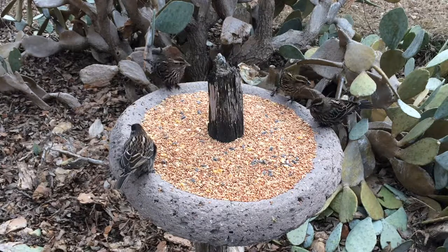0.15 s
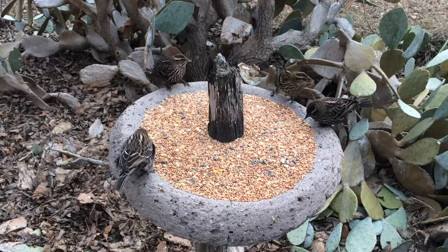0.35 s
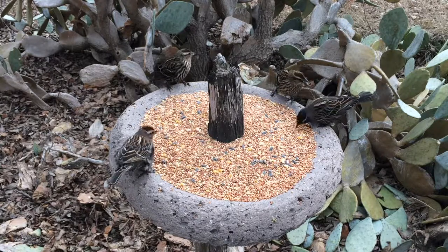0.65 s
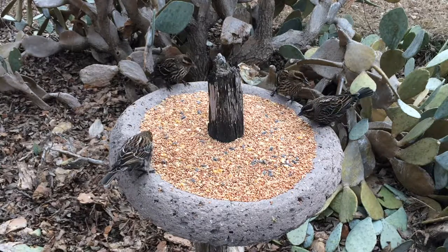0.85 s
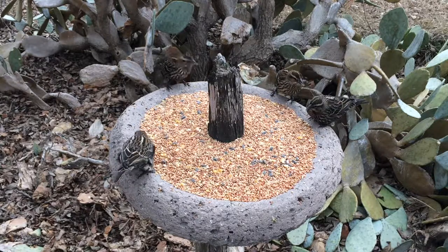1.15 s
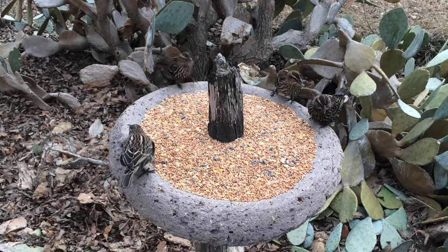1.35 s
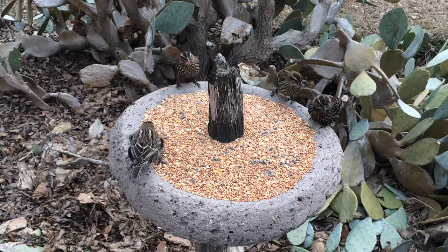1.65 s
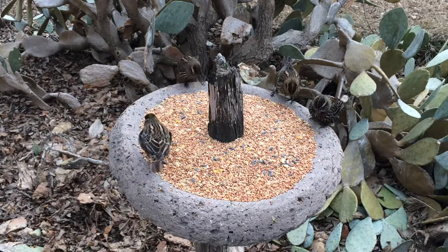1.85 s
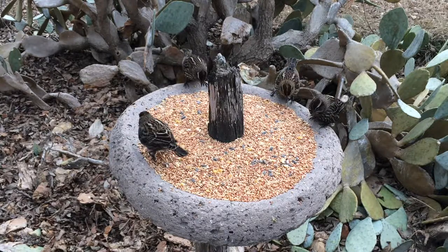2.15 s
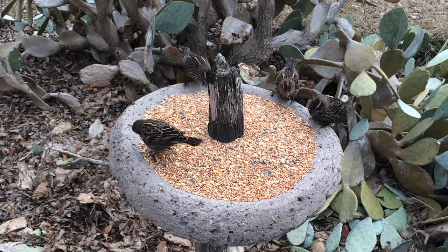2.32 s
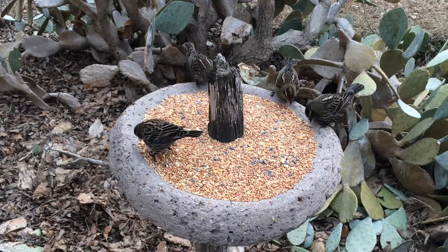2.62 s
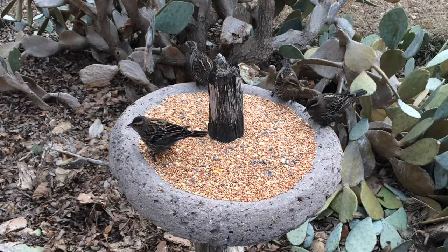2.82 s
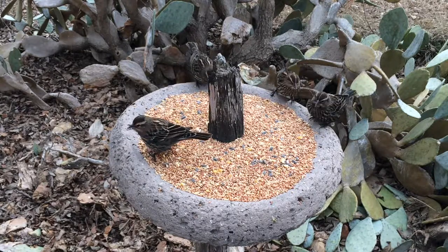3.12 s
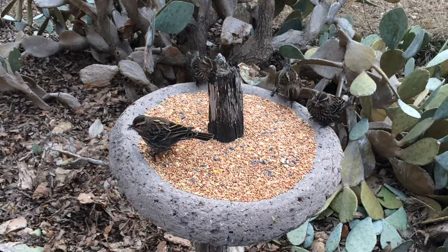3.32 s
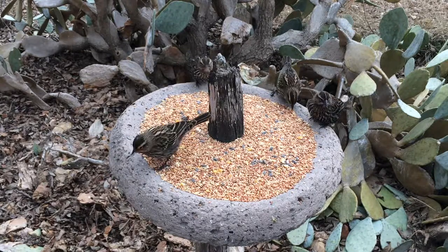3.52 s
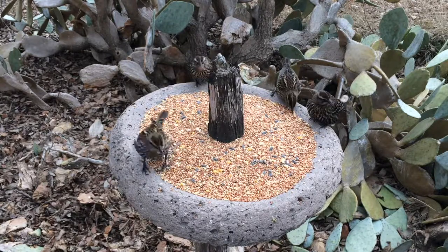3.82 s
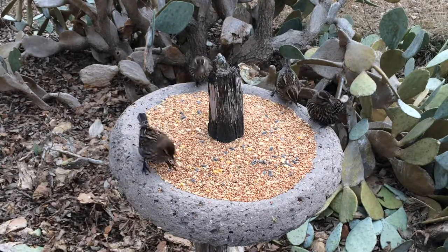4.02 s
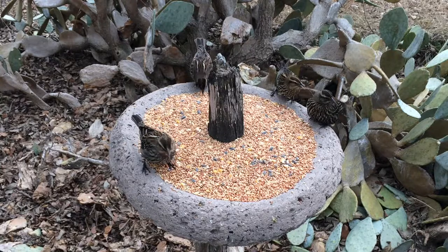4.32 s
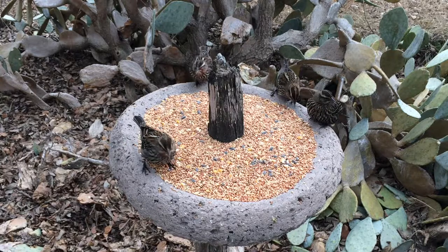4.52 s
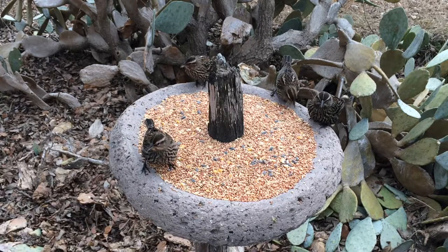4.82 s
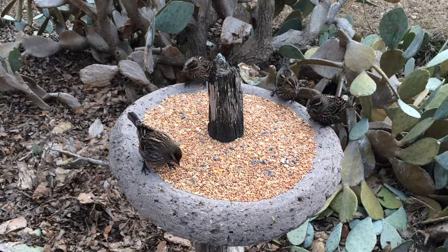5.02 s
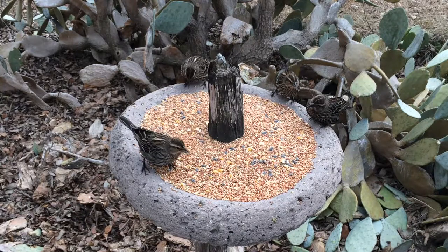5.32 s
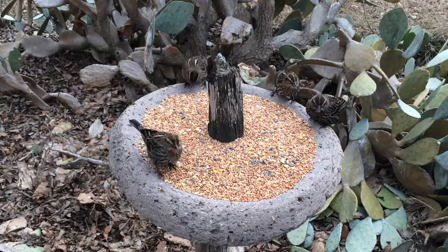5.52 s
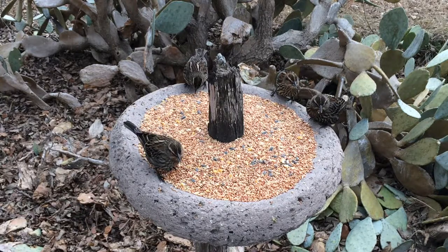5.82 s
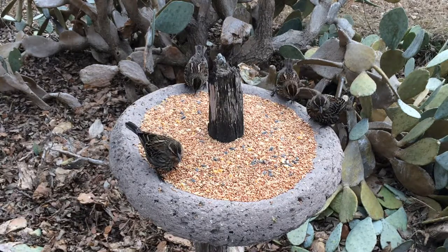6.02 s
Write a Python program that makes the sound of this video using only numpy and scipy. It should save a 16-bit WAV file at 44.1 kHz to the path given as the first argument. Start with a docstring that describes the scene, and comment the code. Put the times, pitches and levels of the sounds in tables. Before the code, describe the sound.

Irregular clicks of birds cracking seed husks in a stone bowl, with occasional brief calls and light gusts on the microphone.

```python
"""Sparrows feed on seed in a stone bowl among cactus in a quiet garden.
Beaks tick and husks crack: each snap rings beak and seed, and ground and plants scatter it back.
Loose seed shifts and crackles under the birds. They call in thin rising notes; lower chirps come
from further off. Light gusts rumble on the microphone over a soft outdoor hush."""
import sys
import numpy as np
from scipy import signal
from scipy.fft import rfft, irfft
from scipy.io import wavfile
from scipy.ndimage import uniform_filter1d

SR = 44100
rng = np.random.default_rng(int(sys.argv[2]) if len(sys.argv) > 2 else 0)


def dump_mix(stems):
    """Bounce the given channels to the path in sys.argv[1] as a 16-bit WAV at rate SR."""
    frames = np.atleast_2d(stems).T  # one column per channel
    limited = np.clip(frames, -1, 1)  # hard clip at full scale
    pcm = np.round(limited * 32767).astype(np.int16)
    wavfile.write(sys.argv[1], SR, pcm)


N = 271297
TIME_S = np.arange(N) / SR

# Hush spectrum (frequency [Hz], relative density [dB])
HUSH_SPECTRUM = [(71, -30), (120, -5), (173, -2), (231, -7), (348, -8), (436, -10.5), (569, -11.5),
                 (805, -14), (892, -14), (1520, -19), (1940, -21.5), (2870, -27.5), (4780, -33),
                 (14200, -36), (16000, -45)]
# Slow swell of the hush (time [s], gain [dB])
HUSH_SWELL = [(0, -2), (4.0, -1.83), (4.8, -.7), (6.15, -0.8)]
# Wind spectrum (frequency [Hz], relative density [dB])
WIND_SPECTRUM = [(30, -20), (42, -10.5), (55, 1.5), (80, -0.5), (115, -3), (185, -13.5), (280, -35),
                 (450, -37)]
# Breeze envelope (time [s], relative level [dB])
BREEZE = [(0, -54), (.4, -50), (.7, -47), (1.15, -49), (1.45, -58.5), (2.4, -59), (2.7, -54), (4.25, -59),
          (4.7, -51), (5.25, -51), (5.5, -55.5), (6.15, -60.5)]
# Single eddies (time [s], peak level [dB])
BUFFETS = [(0.016, -39), (0.484, -34), (0.551, -37.5), (0.688, -35.5), (0.808, -35), (0.919, -48),
           (0.995, -32), (1.095, -41), (1.288, -38.5), (4.702, -39.5), (4.783, -33.5), (4.922, -45.5),
           (5.037, -47.5), (5.105, -45), (5.161, -48)]
# Low chirps (time [s], pitch [Hz], level [dB])
CHIRPS = [(1.487, 1530, -58.5), (2.678, 2490, -67), (4.937, 1937, -50.5), (5.197, 1570, -65.5),
          (5.558, 1850, -58)]
# Upward flicks in each chirp (delay [s], length [s], start [x pitch], end [x pitch], gain [dB])
FLICKS = [(0, .013, 1, 1.9, 0), (0.012, .015, 1.2, 1.5, -.5), (.017, .009, 1.5, 1.8, -6)]
# Thin calls (time [s], length [s], start pitch [Hz], top pitch [Hz], level [dB])
THIN_CALLS = [(1.523, .04, 6600, 7700, -62), (1.928, 0.027, 6200, 7700, -52),
              (4.388, 0.024, 5400, 7780, -43.5), (4.769, .031, 5500, 7240, -56.5),
              (5.697, 0.027, 5900, 7750, -56), (5.796, 0.042, 6700, 7470, -64.5),
              (5.89, 0.069, 6650, 6820, -71), (5.978, .045, 4900, 5440, -75),
              (6.065, 0.072, 4150, 4300, -75)]
# Seed-on-seed spectrum (frequency [Hz], relative density [dB])
SEED_SPECTRUM = [(2500, -26), (4000, 4), (7000, 6.5), (10000, 5), (13500, 8), (16000, 8.5)]
# Birds shuffling in the seed (time [s], relative level [dB])
SHUFFLE = [(0.0, -79), (1.4, -76.5), (1.66, -71.5), (2.88, -79), (3.54, -72.5), (4.01, -72), (4.31, -69),
           (4.81, -73.5), (5.46, -69.5), (6.15, -72)]
# Beak or foot sweeping the seed (first stroke [s], last stroke [s], relative level [dB])
RUMMAGES = [(1.39, 1.39, -69), (2.04, 2.19, -68), (2.816, 2.816, -69.5), (3.476, 3.545, -65),
            (3.72, 3.72, -68.5), (3.97, 4.03, -65.5), (5.08, 5.53, -70.5), (5.727, 5.727, -63.5)]
# Pecks and husk cracks, three modes each
# (time [s], relative level [dB], low mode [Hz], middle mode re low [dB], high mode re low [dB])
PECKS = [(0.425, -17, 4210, -24, -6), (0.4387, -26, 2800, -1, -6), (0.451, -25.5, 4010, -7, -3),
         (0.654, -28, 4640, -23, -15), (0.6942, -26.5, 3150, -1.5, 4), (0.701, -32, 3240, -14, 1),
         (0.791, -35, 3550, -6, 1), (1.3031, -14.5, 4650, -24, -12.5), (1.563, -11, 2990, -9, -10),
         (1.6651, -6.5, 4020, -16, -15), (1.7401, -25, 3220, 3, -19), (1.7555, -14.5, 3100, -6, -7),
         (1.9024, -4, 1740, -13.5, -10), (2.3659, -26.5, 2750, -1.5, -1), (2.4753, -2.5, 4560, -4, 2.5),
         (3.0856, -30, 3580, -13, -9), (3.1077, -29.5, 5430, -3.5, -5), (3.1345, -13, 3170, -12, -9),
         (3.2598, -4, 5000, -3, -15), (3.2663, -18.5, 2180, 13, -1), (3.5864, -27.5, 3040, -22, -9),
         (3.7025, -31.5, 4300, -5, 0), (3.7683, -20, 3170, -4, -1), (3.9511, -28, 3190, -10, 3),
         (4.1691, -9.5, 4050, -6, -11), (4.1765, -18, 3420, 12.5, 11.5), (4.2008, -14.5, 2530, -1, -12),
         (4.2441, -28, 2990, 0, -13), (4.2611, -17.5, 1750, 5.5, -11), (4.2648, -22, 2470, 11, 1),
         (4.275, -27, 2090, 12, -6), (4.2866, -12, 2530, -4, -11.5), (4.2911, -23, 2480, 6, 8),
         (4.3196, -8.5, 3700, -12, -12), (4.3705, -27, 2280, 9.5, -10), (4.382, -39, 1630, 11, 12),
         (4.4497, -7.5, 3380, -0.5, -10), (4.4832, -26, 4550, -16, -20), (4.5279, -2, 3930, -10.5, -11),
         (4.6978, -15, 1770, 9, 6), (4.7022, -17, 2950, 6, 0), (4.8693, -19, 3000, -7, -10),
         (4.8881, -15, 2790, -24, -10), (5.3255, -28.5, 2380, -3, 3), (5.6387, -31, 4930, -6, -1),
         (5.6929, -15, 2550, -25, 0.5), (5.933, 0.5, 3650, -33, -14)]
# Damping of the low, middle and high mode (Q per filter pass [-])
MODE_Q = (1.8, 2.2, 2.8)
LOW_MODE_HZ, MIDDLE_MODE_HZ, HIGH_MODE_HZ = 3200, 7170, 13600   # beak and seed, typical peck


def from_db(db):
    return 10 ** (np.asarray(db) / 20)


def unit_rms(x):
    return x / np.sqrt(np.mean(x ** 2) + 1e-20)


def unit_energy(x):
    return x / np.sqrt(np.sum(x ** 2) + 1e-20)


def envelope(rows):
    """Amplitude curve through (time [s], level [dB]) points."""
    return from_db(np.interp(TIME_S, *np.transpose(rows)))


def add(out, time_s, sound):
    at = max(round(time_s * SR), 0)
    out[at:at + len(sound)] += sound[:max(N - at, 0)]


def butter(x, order, hz, kind="low"):
    return signal.sosfilt(signal.butter(order, hz, kind, fs=SR, output="sos"), x)


def resonate(x, hz, q):
    """Two-pass resonance, peak gain 1."""
    b, a = signal.iirpeak(hz, q, fs=SR)
    return signal.lfilter(b, a, signal.lfilter(b, a, x + 1e-18))


def coloured(white, spectrum):
    """Shape to a spectrum, steep roll-off past its ends; rms 1."""
    hz, db = np.transpose(spectrum)
    bins_hz = np.maximum(np.arange(N // 2 + 1) * SR / N, 1)
    rolloff = np.minimum(bins_hz / hz[0], 1) ** 4 * np.minimum(hz[-1] / bins_hz, 1) ** 4
    gain = from_db(np.interp(np.log(bins_hz), np.log(hz), db))
    return unit_rms(irfft(rfft(white) * rolloff * gain, N))


def garden(x, near_db, far_db, near_t60_s=.044, far_t60_s=.23, predelay_s=.004):
    """Add quick, thin echoes off bowl, ground and cactus, and a duller tail from further plants."""
    t = np.arange(SR // 2) / SR
    age_s = np.maximum(t - predelay_s, 0)

    def scatter(rise_s, t60_s):
        return rng.standard_normal(len(t)) * (1 - np.exp(-age_s / rise_s)) * from_db(-60 * age_s / t60_s)

    near = butter(scatter(.0015, near_t60_s), 1, 2500, "high")
    far = butter(scatter(.01, far_t60_s), 1, 9000)
    echoes = from_db(near_db) * unit_energy(near) + from_db(far_db) * unit_energy(far)
    return x + signal.fftconvolve(x, echoes)[:N]


def hush(level_db=-57):
    """Far outdoor noise, swelling slowly."""
    return from_db(level_db) * envelope(HUSH_SWELL) * coloured(rng.standard_normal(N), HUSH_SPECTRUM)


def wind(breeze_gain_db=-.5, rise_s=.024, fall_s=.028):
    """Breeze rumbles on the microphone; stronger eddies swell and die on top."""
    rumble = coloured(rng.standard_normal(N), WIND_SPECTRUM)
    running_rms = np.sqrt(uniform_filter1d(rumble ** 2, size=3000) + 1e-6)
    buffets = np.zeros(N)
    for time_s, db in BUFFETS:
        width_s = np.where(TIME_S < time_s, rise_s, fall_s)
        buffets += from_db(db) * np.exp(-((TIME_S - time_s) / width_s) ** 2)
    breeze = from_db(breeze_gain_db) * envelope(BREEZE)
    return np.hypot(breeze, buffets) * rumble / running_rms


def whistle(hz, hoarseness, octave_db):
    """Bird note: sine plus weak octave; hoarseness shakes pitch and level."""
    wobble, flutter = unit_rms(uniform_filter1d(rng.standard_normal((2, len(hz))), size=40))
    phase = 2 * np.pi * np.cumsum(hz + 260 * hoarseness * wobble) / SR
    swell = signal.windows.tukey(len(hz), .8) * unit_rms(1 + .55 * hoarseness * flutter)
    return np.sqrt(2) * swell * (np.sin(phase) + from_db(octave_db) * np.sin(2 * phase))


def chirps():
    """Three short, rough flicks merge into each dry chuck."""
    out = np.zeros(N)
    for time_s, pitch_hz, db in CHIRPS:
        for delay_s, length_s, start, end, flick_db in FLICKS:
            hz = pitch_hz * np.geomspace(start, end, round(length_s * SR))
            flick = whistle(hz, hoarseness=.8, octave_db=-19)
            add(out, time_s + delay_s, from_db(db + flick_db) * flick)
    return garden(out, near_db=-1.5, far_db=-16.5)


def thin_calls(farthest_db=-72.5, nearest_db=-49.5):
    """Arching notes; fainter birds are further off, so blur and ring on more among the plants."""
    close, distant = np.zeros(N), np.zeros(N)
    for time_s, length_s, start_hz, top_hz, db in THIN_CALLS:
        distance = np.interp(db, [farthest_db, nearest_db], [1, .1])
        rise_s = np.interp(distance, [0, 1], [.021, .0346])
        hoarseness = np.interp(distance, [0, 1], [.35, 1])
        t = np.arange(round(length_s * SR)) / SR
        hz = top_hz - (top_hz - start_hz) * (1 - t / rise_s) ** 2
        note = from_db(db) * whistle(hz, hoarseness, octave_db=-16)
        add(close, time_s, (1 - distance) * note)
        add(distant, time_s, distance * note)
    return (garden(close, near_db=-17, far_db=-13.5, far_t60_s=.28)
            + garden(distant, near_db=-1, far_db=-2, far_t60_s=.35))


def grains(rate_per_s, spread_db):
    """Seed-on-seed knocks, many faint, a few sharp; rms 1."""
    sizes = from_db(spread_db * np.minimum(rng.exponential(1, N), 4))
    signs = rng.choice([-1, 1], N)
    knocks = rng.random(N) < rate_per_s / SR
    return coloured(knocks * sizes * signs, SEED_SPECTRUM)


def loose_seed(shuffle_gain_db=-1.5, rummage_gain_db=1, nominal_gap_s=.074, stroke_s=.019):
    """Grains shift under the birds throughout and crackle at each rummaging stroke."""
    shuffling = envelope(SHUFFLE) * grains(rate_per_s=2500, spread_db=3.5)
    strokes = np.zeros(N)
    for first_s, last_s, db in RUMMAGES:
        count = 1 + round((last_s - first_s) / nominal_gap_s)
        for time_s in np.linspace(first_s, last_s, count):
            strokes += from_db(db) * np.exp(-2 * ((TIME_S - time_s) / stroke_s) ** 2)
    rummaging = strokes * grains(rate_per_s=900, spread_db=4.5)
    return from_db(shuffle_gain_db) * shuffling + from_db(rummage_gain_db) * rummaging


def nibbles(mean_per_s=11, level_db=-40.5, spread_db=2, spread_oct=.25, middle_db=-5.5, high_db=-2.5):
    """Faint random husking ticks, denser when the birds are busy; rows as in PECKS."""
    activity = envelope(SHUFFLE)
    rate_per_s = mean_per_s * activity / activity.mean()
    times_s = TIME_S[rng.random(N) < rate_per_s / SR]
    draws = rng.standard_normal((len(times_s), 2))
    return [(time_s, level_db + spread_db * size, LOW_MODE_HZ * 2 ** (spread_oct * pitch),
             middle_db, high_db) for time_s, (size, pitch) in zip(times_s, draws)]


def snap(modes, splinter_db, spray_onset_s=.0004, spray_decay_s=.0017):
    """One sharp break and a dying spray of tiny ones ring beak and seed."""
    t = np.arange(SR // 64) / SR
    sizes = rng.standard_normal(len(t)) * rng.random(len(t)) ** 2
    spray = sizes * np.exp(-t / spray_decay_s) * (t > spray_onset_s)
    force = (t == 0) + from_db(splinter_db) * unit_energy(spray)
    ring = sum(sign * from_db(db) * resonate(force, hz, q)
               for sign, (hz, db), q in zip((1, -1, 1), modes, MODE_Q))
    low_hz = modes[0][0]
    return butter(ring, 3, .55 * low_hz, "high")   # a small body barely radiates below its low mode


def pecks(direct_db=-2, reflected_db=-12, reflection_s=.00009):
    """Each peck snaps a seed; a reflection off the stone just below colours it hollow."""
    snaps = np.zeros(N)
    for time_s, db, low_hz, middle_db, high_db in list(PECKS) + nibbles():
        middle_hz = MIDDLE_MODE_HZ * (low_hz / LOW_MODE_HZ) ** .28   # partly tracks the low mode
        modes = [(low_hz, db), (middle_hz, db + middle_db), (HIGH_MODE_HZ, db + high_db)]
        add(snaps, time_s, snap(modes, splinter_db=-12 - .35 * db))   # harder pecks break cleaner
    reflection = np.roll(snaps, round(reflection_s * SR))
    at_bowl = from_db(direct_db) * snaps + from_db(reflected_db) * reflection
    return garden(at_bowl, near_db=-17.5, far_db=-29)


def scene():
    """Feeding and calls over hush and wind; mono."""
    feeding = pecks() + loose_seed()
    return (feeding + hush() + thin_calls() + chirps() + wind())[None]


def record(dry):
    """Steep treble cut."""
    return butter(dry, order=18, hz=15900)


dry = scene()
out = record(dry)
dump_mix(out)
```